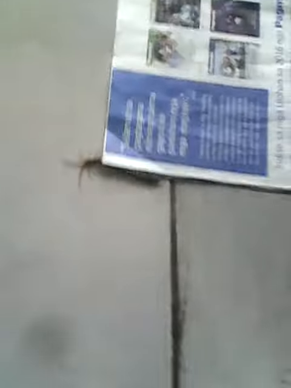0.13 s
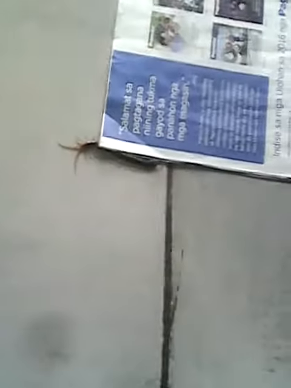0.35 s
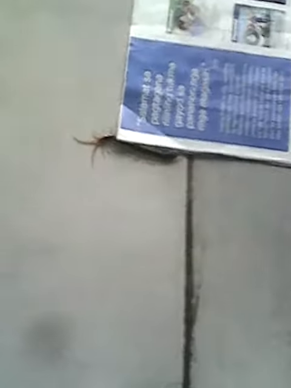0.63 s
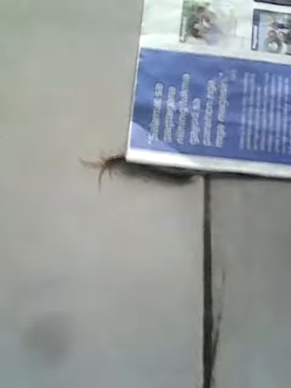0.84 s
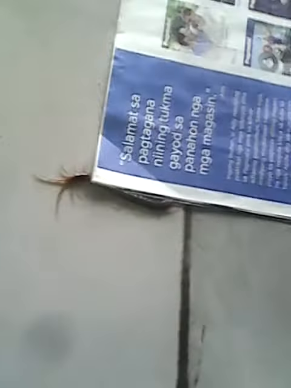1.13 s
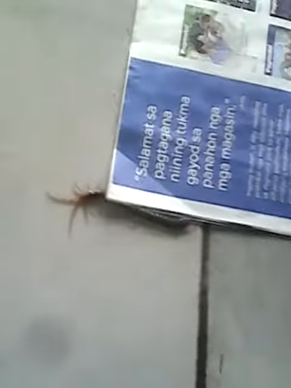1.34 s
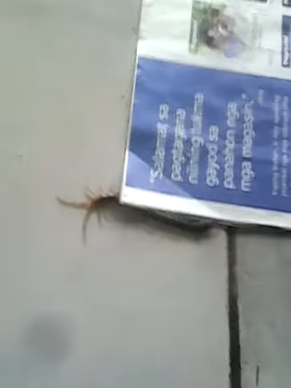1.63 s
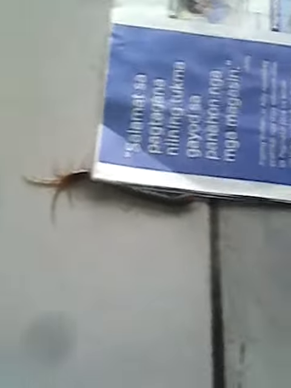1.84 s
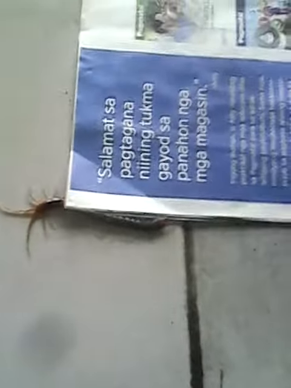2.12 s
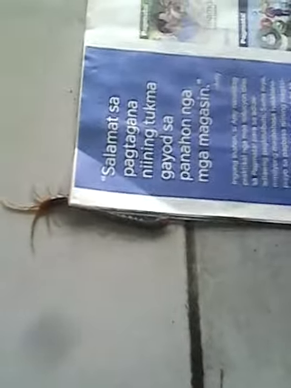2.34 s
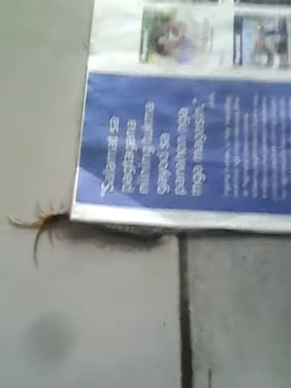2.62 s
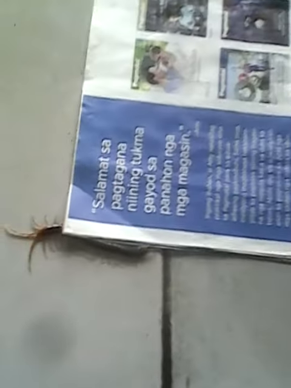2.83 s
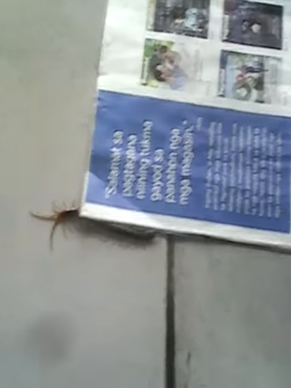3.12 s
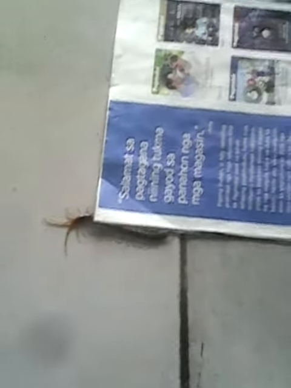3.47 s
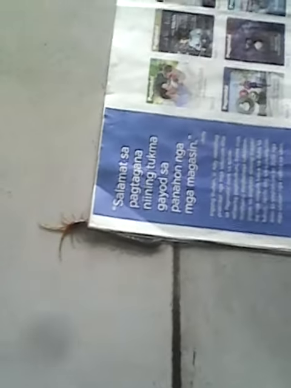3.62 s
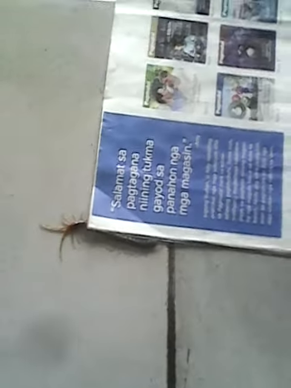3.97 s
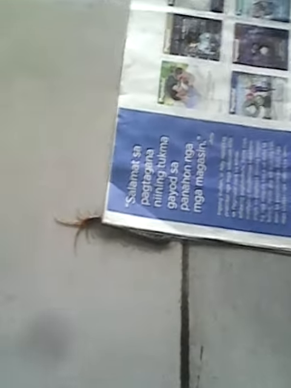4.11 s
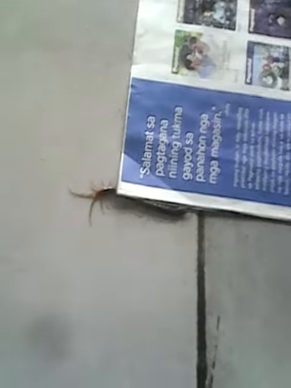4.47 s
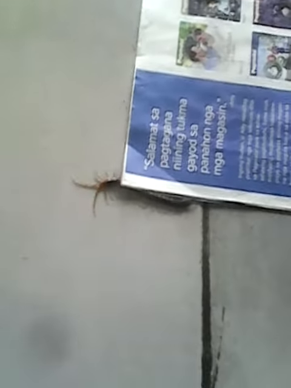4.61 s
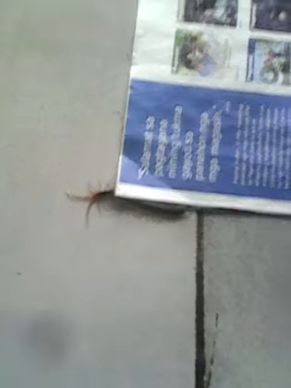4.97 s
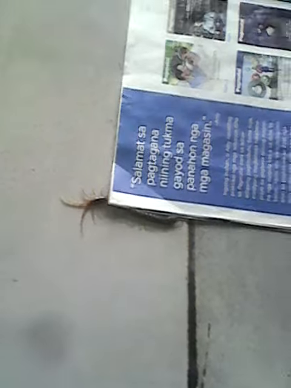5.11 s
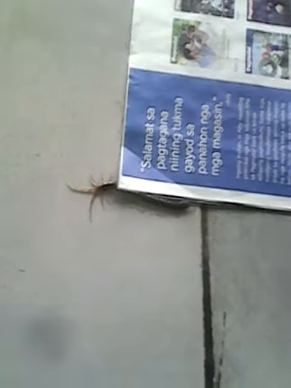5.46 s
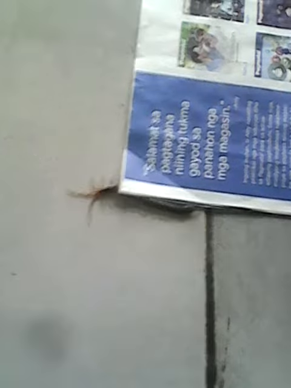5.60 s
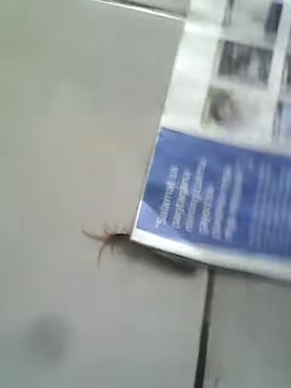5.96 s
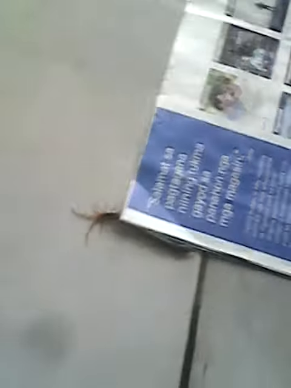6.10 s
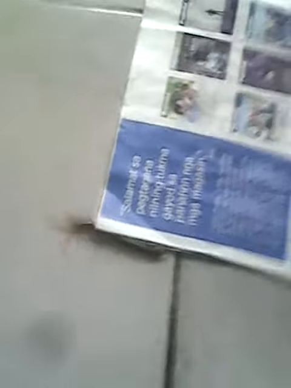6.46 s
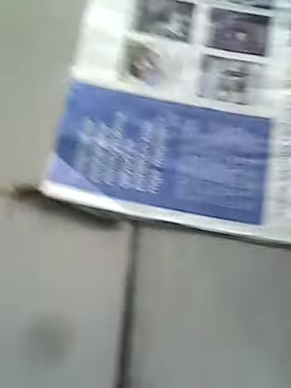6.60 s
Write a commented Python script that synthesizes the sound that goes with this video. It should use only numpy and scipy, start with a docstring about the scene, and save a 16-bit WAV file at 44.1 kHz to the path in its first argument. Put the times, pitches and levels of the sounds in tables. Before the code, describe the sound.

From 0 to 0.5 s there is only a faint far hum in low, wavering tones, with soft rumble and hiss that continue throughout. From about 0.55 to 1.35 s fingers brush a hard plastic casing right at the microphone: clusters of hollow ticks near 0.65, 0.9 and 1.13 s, with dry bright scrapes and a rough nasal creak. Softer creaks and clicks follow at 1.7 to 1.95 s. Then it is sparse: small isolated ticks and slips around 2.6, 2.9, 3.1, 3.4, 3.6 and 4.2 s, very faint ones near 4.9 s, and mostly hum until 5.65 s. There the grip changes: rubbing, a heavy knock at 5.75 s, a thin fingernail skid at 5.84 s, snaps and thick gritty rubbing around 6.0 to 6.2 s, a sharp click at 6.41 s, and the strongest blunt knocks at 6.45 to 6.6 s over a low shake, settling back into hum.

```python
"""A small camera phone is held close over a tiled floor: first a far hum in wavering tones, rumble and hiss.
From half a second fingers brush the plastic case, which ticks and creaks; ticks, slips and a few snaps go on.
From about 5.7 s the grip changes: knocks and snaps, thick rubbing, a fingernail's skid and a low shake.
Blows are sums of decaying case modes with a room echo, rubbing is shaped noise plus a pulsing creak,
and the hum, whistles, skid, shake and background are filtered noise."""
import sys
import numpy as np
from scipy import signal
from scipy.fft import rfft, irfft, next_fast_len
from scipy.io import wavfile
from scipy.ndimage import uniform_filter1d, map_coordinates

SR = 44100
rng = np.random.default_rng(int(sys.argv[2]) if len(sys.argv) > 2 else 0)


def transcribe(u):
    """Save the signal u as a 16-bit wav file named by the first command-line argument.

    u: samples, shape (n,) or (channels, n), limited to [-1, 1]; the rate is SR.
    q: integer samples, one column per channel.
    """
    v = np.clip(np.atleast_2d(u).T, -1, 1)
    q = np.round(v * 32767).astype(np.int16)
    wavfile.write(sys.argv[1], SR, q)


def invert_db(x):
    """Field ratio 10**(x/20) for x, a level in decibels (scalar or array-like)."""
    u = np.asarray(x, float) / 20
    return 10 ** u


N = 299233  # length in samples

# Steady hum tones. Each row: centre in Hz, width in Hz, level in dB.
HUM_TONES = [(75.8, 2.5, -75.5), (121.9, 6.9, -69.5), (180.5, 10, -70), (375, 5, -84), (419, 5.8, -71.5),
             (578.8, 1.8, -67.5), (627, 4, -79), (663, 2.9, -76), (1640, 8, -84)]
# Hum tones that come up for a while. Each row: centre in seconds, half length in seconds, pitch in Hz,
# width in Hz, peak level in dB.
HUM_SWELLS = [(0.53, 0.46, 187, 8.8, -60), (1.46, 0.29, 187, 9, -61), (2.53, 1.23, 415, 23, -63),
              (2.22, 0.94, 578, 2.8, -63), (6.65, 0.8, 577, 16, -57.5), (1.55, 0.28, 1600, 60, -72),
              (1.66, 1, 1855, 14, -76.5)]
STEADY = 0.87  # 0 wavers freely, 1 holds its level

# Spectrum of room rumble and microphone hiss. Each row: frequency in Hz, relative level in dB.
AIR_SPECTRUM = [(12, -45), (25, -4), (47, -29.5), (70, -16.5), (170, -1.5), (290, -7), (500, -10.5),
                (900, -11), (1600, -22.5), (2400, -27), (4300, -33), (6600, -36.5), (7600, -46),
                (15500, -46)]
AIR_LEVEL_DB = -61

# Finger strokes in three kinds. Each row: start in seconds, length in seconds, hiss in dB before the tilt,
# creak in dB, brightness as tilt in dB per hiss band.
BRUSHES = [(0.55, 0.037, -62.5, -65, 1), (0.675, 0.058, -66.5, -51.5, 8.5), (0.73, 0.14, -47, -50, 6),
           (1.09, 0.06, -57.5, -56.5, 8.5), (1.25, 0.087, -53, -50, -2), (1.32, 0.077, -64.5, -62, -1.5),
           (1.725, 0.068, -66, -48.5, -6.5), (1.775, 0.055, -62, -45, -4.5),
           (3.02, 0.073, -69, -59.5, -0.5), (5.77, 0.065, -45.5, -44.5, 0.4),
           (5.812, 0.055, -35.5, -37, 1.5), (5.84, 0.084, -42.5, -54, -0.5), (6.06, 0.097, -38, -48, 2.5),
           (6.15, 0.029, -56, -55, -0.5), (6.22, 0.065, -49, -59, -6.5), (6.46, 0.042, -55, -35.5, 4),
           (6.495, 0.073, -53.5, -49, 3.5)]  # swell and fade
DRAGS = [(0.63, 0.028, -56, -53, 13.5), (0.649, 0.023, -48.5, -35, 8), (0.89, 0.033, -39, -41.5, -2),
         (0.95, 0.048, -41, -42, -0.8), (1.125, 0.0604, -39, -41, 0.9), (3.086, 0.025, -47.5, -51.5, -2),
         (3.116, 0.0305, -53, -50.5, -1.5), (5.668, 0.0794, -44, -42.5, -1.5),
         (6.02, 0.1487, -39.5, -51.5, 0), (6.43, 0.062, -39.5, -41, 1.5), (6.54, 0.066, -38.5, -61, 2)]  # build up until the skin sticks
SLIPS = [(0.928, 0.027, -41, -36, 4.5), (1.0, 0.099, -65, -47, 9), (1.131, 0.082, -48, -34, 5.5),
         (1.195, 0.154, -63, -53.5, -1.5), (1.708, 0.16, -58.5, -46, -6), (1.9, 0.1, -65, -54, -7),
         (1.945, 0.048, -60, -55, -14.5), (2.6, 0.18, -74.5, -56, -17), (2.925, 0.065, -67, -50.5, -7.5),
         (3.15, 0.043, -59, -51.5, -3.5), (3.424, 0.037, -72.5, -46.5, -1), (3.577, 0.071, -69, -51.5, 1.5),
         (4.234, 0.11, -78, -54, -6.5), (5.755, 0.035, -38.5, -32.5, 8), (5.925, 0.17, -44.5, -68, -2.5),
         (6.016, 0.048, -33.5, -68, 4.5), (6.185, 0.13, -38.5, -44, -1), (6.26, 0.12, -46, -53, -6.5),
         (6.41, 0.079, -40, -56, -1.5), (6.597, 0.076, -47.5, -47, -0.5), (6.64, 0.26, -68.5, -76, -14)]  # break loose at once and die away
BUILD_DB, SWELL_DB, FADE_DB = 5, 15.5, 24.5  # rise through a drag, depth at a brush's ends, loss through a slip
SWELL_BEND = 1.75  # higher: a brush holds its level longer
FADE_BEND = 1.21  # over 1: a slip holds a while, then fades faster
START_S, STOP_S = 0.009, 0.0087  # time to come up from, or drop to, 40 dB below the stroke
LOW_DB, LOW_PER_BRIGHT = -16, -2  # low modes over hiss; dark, heavy strokes drive them more

# Colour of the rubbing hiss before the tilt. Each row: frequency in Hz, relative level in dB.
SKIN_SPECTRUM = [(650, -23), (1100, 1), (1700, 8), (2050, 4.5), (2400, 1), (2900, 7), (3800, 3.5),
                 (5400, -4.5), (6500, -10), (9000, -20), (15000, -30)]
GRIT_PER_S, GRIT_DB = 1400, -7  # tiny catches in the hiss: rate, level over the smooth noise
# Where the scrape is brightest. Each row: time in seconds, peak in Hz.
SCRAPE_PEAK = [(.63, 5840), (.67, 4600), (.75, 4830), (.82, 4060), (.87, 5240), (.9, 3200), (.99, 4070),
               (1.13, 3000), (1.18, 3280), (1.3, 4500), (1.72, 3140), (1.95, 3190), (3.1, 3760),
               (3.15, 3200), (5.69, 3190), (5.76, 2570), (5.84, 3580), (5.9, 4200), (5.95, 2730),
               (6.04, 2470), (6.11, 3470), (6.2, 3240), (6.3, 2030), (6.41, 3800), (6.48, 3860),
               (6.56, 2800), (6.65, 2230)]
SCRAPE_DB, SCRAPE_OCTAVES = 4.5, 0.59  # height and half width of that peak
# Regular slipping gathers the hiss on multiples of its rate. Each row: centre in seconds,
# half length in seconds, slip rate in Hz, depth in dB.
SQUEALS = [(0.658, .02, 900, 3.5), (0.809, .05, 980, 1.5), (0.907, .035, 933, 5), (.98, .03, 930, 2),
           (1.155, .04, 1002, 2.5), (1.76, .07, 925, 2), (3.11, .05, 920, 4), (5.71, .04, 930, 3.5),
           (5.838, .03, 930, 0.5)]
CREAK_HZ, CREAK_WANDER = 930, 0.03  # mean slip rate, size of its drift as a share
CREAK_CLEAN_DB = -7.5  # steady slips over ragged ones
# Overtones of the creak. Each row: multiple of the slip rate, mean level in dB over the fundamental.
CREAK_OVERTONES = [(2, -10.5), (3, -18.5), (4, -27), (5, -32.5)]

# Modes of the plastic case. Each row: frequency in Hz before detuning, t60 in seconds, relative level in dB,
# build-up in cycles.
CASE_MODES = [(204, 0.019, -36, 0.16), (446, 0.0092, -4, 0.22), (930, 0.01, -2, 1.58),
              (1370, 0.0037, 1.5, 1.2), (1745, 0.0055, -1.5, 2.1), (2520, 0.0047, 1.5, 0.82),
              (2904, 0.0035, -5.5, 1.2), (3970, 0.0023, 4.5, 3), (5740, 0.0057, -4, 0.95),
              (9300, 0.00043, 12.5, 0.34)]
SOFT_DETUNE, HARD_DETUNE = 0.08, 0.025  # spread of the mode shift from blow to blow, as a share
HOLD_CYCLES = 0.96  # how long a tick goes on driving its main mode
HARD_BUILD = 1  # snaps and knocks build up in this share of the cycles
CONTACT_DB_PER_OCTAVE = 37  # loss above the contact's cut-off
# Ticks, the main mode leads. Each row: time in seconds, strength in dB, main mode in Hz,
# weight as low modes over the strength in dB.
TICKS = [(0.6488, -13.5, 863, -29.5), (0.6638, -14.5, 930, -17), (0.6713, -18.5, 846, -40),
         (0.89, -14.5, 964, -19), (0.8996, -14, 905, -33), (0.9134, -19.5, 1040, -23),
         (0.9285, -11.5, 966, -9.5), (0.9335, -19.5, 870, -6), (1.128, -9, 927, -11.5),
         (1.137, -15.5, 930, -27), (1.1556, -14.5, 1026, -28), (1.268, -37, 830, -23),
         (1.4172, -32.5, 890, -36), (1.7086, -24.5, 900, -6.5), (1.841, -24.5, 960, -13),
         (1.8901, -27, 960, -12), (1.895, -11.5, 1002, -12), (1.939, -28, 930, -10),
         (1.942, -18.5, 930, -8.5), (2.588, -34.5, 1048, -6), (2.604, -20.5, 990, -8.5),
         (2.6419, -22, 947, -5.5), (2.9526, -36, 930, 0), (3.418, -31, 930, -16), (3.421, -18.5, 930, -8),
         (3.5729, -17, 948, -7.5), (4.1889, -39, 960, 0), (4.2308, -19, 937, -7), (4.9078, -35, 950, 1.5),
         (4.9586, -27, 940, -4), (6.188, -22.5, 850, -15), (6.4111, -7, 904, -7.5)]
TICK_TOP_HZ = 6500  # contact cut-off
TICK_HIGH_DB, HIGH_PER_WEIGHT = -20, 0.02  # a heavier tick drives the high modes slightly more
TICK_CRACK_DB, CRACK_PER_WEIGHT = -53, -1  # the lighter the tick, the more it cracks
# Snaps, the high modes lead. Each row: time in seconds, strength in dB, low modes over it in dB,
# crack over it in dB, contact cut-off in Hz.
SNAPS = [(2.8136, -52, -10, -7, 9000), (2.923, -37, 3.5, -19.5, 9000), (5.668, -53, -3, -5, 5000),
         (5.928, -44, -23, 0, 7000), (6.0114, -20, -29, 1, 8900), (6.182, -21.5, -21, -3, 4440),
         (6.4116, -17.5, 4, -10, 1900)]
SNAP_RING_DB, RING_PER_LOW, SNAP_RING_HZ = 0, 0.45, 770  # main ring: level, share of low-mode dB, pitch
# Knocks, the low modes lead. Each row: time in seconds, strength in dB, loudest mode in Hz,
# main ring over the strength in dB, high modes over it in dB.
KNOCKS = [(5.7503, -3, 574, -10, -0.5), (6.4566, -13, 762, 5.5, -13), (6.5366, 7, 470, -20.5, -7),
          (6.597, -1.5, 329, -39, -20)]
KNOCK_CRACK_DB, CRACK_PER_HIGH = -13.5, 0.97  # more high modes bring more crack

# Decay of the room's echo. Each row: frequency in Hz, t60 in seconds.
ROOM_DECAY = [(300, 0.18), (1000, 0.15), (5000, 0.16)]
# Faint short whistles. Each row: centre in seconds, half length in seconds, pitch in Hz, width in Hz,
# peak level in dB.
WHISTLES = [(0.665, .012, 8600, 300, -78), (0.9, .016, 6620, 140, -67), (0.905, .022, 7820, 120, -73),
            (1.135, .012, 8100, 200, -74), (3.098, .011, 6950, 200, -71), (5.7, .025, 6150, 200, -68),
            (6.36, .035, 1950, 90, -72), (6.73, .045, 5920, 110, -83), (6.72, .06, 4300, 110, -82)]
# A fingernail skids, thin and high. The row: centre in seconds, half length in seconds, mean peak level in dB.
NAIL_SKID = (5.84, 0.027, -66)
# The moving hand shakes the phone. The row: centre in seconds, half length in seconds, centre in Hz,
# width in Hz, mean peak level in dB.
HAND_SHAKE = (6.45, .22, 115, 120, -55)

# How case vibration reaches the microphone. Each row: frequency in Hz, gain in dB.
MIC_PATH = [(40, -46), (110, -5), (220, 1), (6600, -4.5), (7800, -15), (10500, -33), (14000, -38.5)]
OVERLOAD = 1.5  # the capsule's largest swing
BOTTOM_HZ, TOP_HZ = 45, 13100  # the converter's band


def unit(x):
    """Scaled to rms 1."""
    return x / np.sqrt(np.mean(x ** 2) + 1e-20)


def along(points, hz):
    """Reads a curve of (Hz, value) points on a log frequency axis."""
    f, v = np.transpose(points)
    return np.interp(np.log(hz + 1), np.log(f + 1), v)


def wobble(rate):
    """A smooth random curve, rate knots a second."""
    knots = rng.standard_normal(int(N * rate / SR) + 4)
    return map_coordinates(knots, [np.arange(N) * rate / SR])


def noise(response):
    """Fresh noise of rms 1 with a gain for each frequency."""
    m = next_fast_len(N)
    spectrum = rfft(rng.standard_normal(m)) * response(np.fft.rfftfreq(m, 1 / SR))
    return unit(irfft(spectrum, m)[:N])


def bell(hz, width):
    """Gain of one resonance."""
    return lambda f: 1 / (1 + ((f - hz) / (width / 2)) ** 2)


def moment(centre, half):
    """A smooth rise and fall that peaks at 1; both times in seconds."""
    return np.exp(-((np.arange(N) / SR - centre) / half) ** 2)


def tone(hz, width):
    """A narrow band of noise, rms 1, with its slow swells partly evened out."""
    x = noise(bell(hz, width))
    slow_power = np.abs(uniform_filter1d(x ** 2, size=SR // 8))
    return unit(x / slow_power ** (STEADY / 2))


def hum():
    """A far appliance: narrow unsteady tones, some always there and some that come and go."""
    steady = sum(invert_db(db) * tone(hz, width) for hz, width, db in HUM_TONES)
    swelling = sum(invert_db(db) * moment(s, half) * tone(hz, width) for s, half, hz, width, db in HUM_SWELLS)
    return steady + swelling


def air():
    """Room rumble and microphone hiss: shaped noise whose level drifts slowly."""
    return invert_db(AIR_LEVEL_DB + 0.6 * wobble(3)) * noise(lambda f: invert_db(along(AIR_SPECTRUM, f)))


def strokes():
    """Power of hiss, creak and low modes over time, and the brightness averaged by hiss power."""
    power, bright, t = np.full((3, N), 1e-14), np.zeros(N), np.arange(N) / SR
    u = np.linspace(0, 1, 9)  # progress through a stroke
    kinds = [(DRAGS, -BUILD_DB * (1 - u)),
             (BRUSHES, -SWELL_DB * np.abs(2 * u - 1) ** SWELL_BEND),
             (SLIPS, -FADE_DB * u ** FADE_BEND)]
    for rows, shape_db in kinds:
        for s, length, hiss_db, creak_db, tilt in rows:
            begin, end = s - START_S, s + length + STOP_S
            span = slice(round(begin * SR), round(end * SR))
            times = [begin, *(s + length * u), end]
            envelope = invert_db(np.interp(t[span], times, [-40, *shape_db, -40])) ** 2
            low_db = hiss_db + LOW_DB + LOW_PER_BRIGHT * tilt
            power[:, span] += invert_db([[hiss_db], [creak_db], [low_db]]) ** 2 * envelope
            bright[span] += tilt * invert_db(hiss_db) ** 2 * envelope
    return power, bright / power[0]


def gritty():
    """White noise strewn with single sharp catches of uneven size."""
    chance, size = rng.random(N), rng.standard_normal(N)
    catches = (chance < GRIT_PER_S / SR) * size
    return rng.standard_normal(N) + invert_db(GRIT_DB) * unit(catches)


def streaky(x, depth_db):
    """Narrow resonances come and go with the skin's contact patch, a broad one moves, squeals form combs."""
    z = signal.stft(x, nperseg=256)[2]
    field = uniform_filter1d(rng.standard_normal(z.shape), size=2, axis=0)
    field = uniform_filter1d(field, size=18, axis=1)
    s, peak_hz = np.transpose(SCRAPE_PEAK)
    hz, t = np.fft.rfftfreq(256, 1 / SR)[:, None] + 1, np.arange(z.shape[1]) * 128 / SR
    octaves_off = np.log2(hz / np.interp(t, s, peak_hz))
    hump_db = SCRAPE_DB * np.exp(-(octaves_off / SCRAPE_OCTAVES) ** 2)
    comb_db = sum(db * np.exp(-((t - at) / half) ** 2) * np.cos(2 * np.pi * hz / rate_hz)
                  for at, half, rate_hz, db in SQUEALS)
    gain = invert_db(depth_db * unit(field) + hump_db + comb_db)
    return unit(signal.istft(z * gain, nperseg=256)[1][:N])


def skin_hiss(tilt):
    """Grainy friction noise in four bands, tilted towards dark or bright from stroke to stroke."""
    centres = [1100, 2200, 4400, 6600]  # Hz
    spectrum, f = rfft(streaky(gritty(), depth_db=2.5)), np.fft.rfftfreq(N, 1 / SR)
    spectrum = spectrum * invert_db(along(SKIN_SPECTRUM, f))
    spectrum = spectrum / np.std(irfft(spectrum, N))
    hiss = np.zeros(N)
    for k in range(len(centres)):
        weight = along([(hz, float(i == k)) for i, hz in enumerate(centres)], f)
        hiss += invert_db(tilt * (k - 1.5)) * irfft(spectrum * weight, N)
    return hiss


def creak():
    """A rough pulse train near the main mode: ragged noise bands plus steadier slips with overtones."""
    ragged = noise(lambda f: bell(930, 240)(f) + invert_db(-9.5) * bell(1870, 260)(f)
                   + invert_db(-19.0) * bell(2900, 350)(f))
    rate = CREAK_HZ * (1 + CREAK_WANDER * (wobble(15) + wobble(120)))
    turns = 2 * np.pi * np.cumsum(rate) / SR
    slips = np.sin(turns)
    for k, db in CREAK_OVERTONES:
        slips = slips + invert_db(db + 4.3 * wobble(40)) * np.sin(k * turns)
    return unit(ragged + invert_db(CREAK_CLEAN_DB + 3.9 * wobble(90)) * unit(slips))


def rubbing():
    """Skin dragging on plastic: grainy hiss, a creak near the case's main mode and a murmur of low modes."""
    power, tilt = strokes()
    hiss_gain, creak_gain, low_gain = np.sqrt(power)
    hiss = invert_db(1.8 * wobble(170)) * skin_hiss(tilt)  # stick and slip
    ring = invert_db(1.74 * wobble(120)) * creak()
    low = noise(bell(510, 460))
    return hiss_gain * hiss + creak_gain * ring + low_gain * low


def blows():
    """Each blow: time, loudest mode, dB of low modes, main ring, high modes and crack, softness, cut-off."""
    rows = []
    for s, db, hz, weight in TICKS:
        high = TICK_HIGH_DB + HIGH_PER_WEIGHT * weight
        crack = TICK_CRACK_DB + CRACK_PER_WEIGHT * weight
        rows.append((s, hz, db + np.array([weight, 0, high, crack]), True, TICK_TOP_HZ))
    for s, db, low, crack, top_hz in SNAPS:
        ring = SNAP_RING_DB + RING_PER_LOW * low
        rows.append((s, SNAP_RING_HZ, db + np.array([low, ring, 0, crack]), False, top_hz))
    for s, db, hz, ring, high in KNOCKS:
        crack = KNOCK_CRACK_DB + CRACK_PER_HIGH * high
        rows.append((s, hz, db + np.array([0, ring, high, crack]), False, SR))  # no contact loss
    return rows


def case_blows():
    """Each tick, snap or knock rings all case modes in step; the groups of modes share it differently."""
    out, t = np.zeros(N + SR), np.arange(-SR // 50, SR // 12) / SR
    hz, t60, db, soft_build = np.transpose(CASE_MODES)[..., None]
    group = np.digitize(hz, [700, 1200, 3500])  # low, main, high, crack
    rows = blows()
    scatter = rng.standard_normal((len(rows), 2, len(CASE_MODES), 1))
    for (s, loudest_hz, group_db, soft, top_hz), (detune, strength) in zip(rows, scatter):
        f = hz * (1 + (SOFT_DETUNE if soft else HARD_DETUNE) * detune)
        f[1 if loudest_hz < 650 else 2] = loudest_hz
        build, hold = HARD_BUILD * soft_build, 0
        if soft:
            build, hold = soft_build, HOLD_CYCLES * (group == 1) / f
            f[[4, 6], 0] = 2 * loudest_hz, 3 * loudest_hz  # the driven ring is lopsided: its overtones show
        # the modes are in phase at the blow; each takes its own number of cycles to build up
        cycles = np.maximum(t * f + build, 0)
        rise = (1 - np.exp(-cycles / (1.267 * build))) ** 2
        # modes that are not held already decay while they build up
        decay = invert_db(-60 * np.maximum(t - hold, -build / f * (hold == 0)) / t60)
        contact_loss_db = CONTACT_DB_PER_OCTAVE * np.maximum(np.log2(f / top_hz), 0)
        level = invert_db(group_db[group] + db + 0.79 * strength - contact_loss_db)
        ringing = level * rise * decay * np.cos(2 * np.pi * f * t)
        out[round((s + t[0]) * SR):][:len(t)] += ringing.sum(0)
    return out[:N]


def room(x):
    """Tiles and walls answer with a decaying noise tail, a new one for each quarter second."""
    out, step = np.zeros(N + SR), SR // 4
    for start in range(0, N, step):
        hz, t, z = signal.stft(rng.standard_normal(SR // 4), SR, nperseg=256)
        decay = invert_db(-60 * t / along(ROOM_DECAY, hz)[:, None])
        tail = signal.istft(z * decay, SR, nperseg=256)[1]
        wet = signal.fftconvolve(x[start:start + step], tail / np.linalg.norm(tail))
        out[start + 200:][:len(wet)] += wet  # 200 samples of delay
    return out[:N]


def whistles():
    """Faint short whistles: narrow bands of noise that rise and fall."""
    return sum(invert_db(db) * moment(s, half) * tone(hz, width) for s, half, hz, width, db in WHISTLES)


def nail_skid():
    """One short fluttering skid, a high noise band that reaches the microphone through the air."""
    s, half, db = NAIL_SKID
    return invert_db(db + 4.1 * wobble(250)) * moment(s, half) * noise(bell(8800, 3500))


def hand_shake():
    """A low uneven rumble while the grip changes: noise round one resonance, thinned in the deepest bass."""
    s, half, hz, width, db = HAND_SHAKE
    rumble = noise(lambda f: bell(hz, width)(f) * (f / (f + 60)) ** 4)
    return invert_db(db + 5.6 * wobble(36)) * moment(s, half) * rumble


def scene():
    """Handling noise through the case, the blows' echo and the background."""
    struck = case_blows()
    handling = struck + invert_db(-16.5) * room(struck) + rubbing()
    handling = np.clip(handling, -OVERLOAD, OVERLOAD)
    mic_gain = invert_db(along(MIC_PATH, np.fft.rfftfreq(N, 1 / SR)))
    heard = irfft(rfft(handling) * mic_gain, N)
    return (hum() + air() + heard + whistles() + nail_skid() + hand_shake())[None]


def top_cut(x):
    """Nothing passes above the cut-off."""
    return signal.sosfilt(signal.butter(12, 16620, fs=SR, output="sos"), x)


def record(dry):
    """The converter tops out at full scale and rounds off the deepest bass and the treble."""
    band = signal.butter(2, [2 * BOTTOM_HZ / SR, 2 * TOP_HZ / SR], "band")
    mix = signal.lfilter(*band, np.clip(dry, -1, 1))
    return top_cut(mix)


dry = scene()
out = record(dry)
transcribe(out)
```